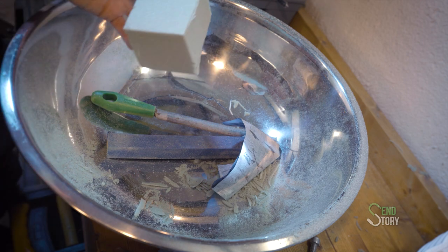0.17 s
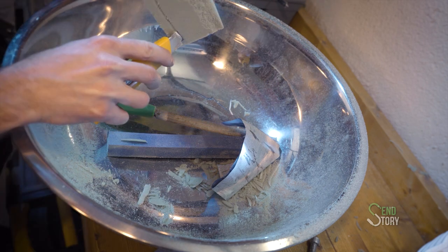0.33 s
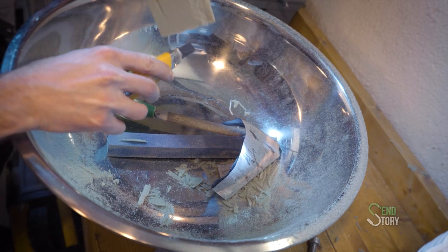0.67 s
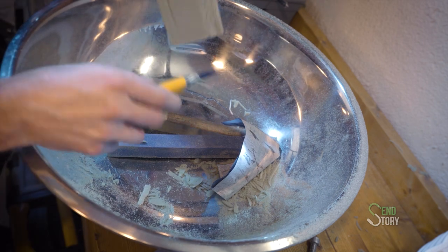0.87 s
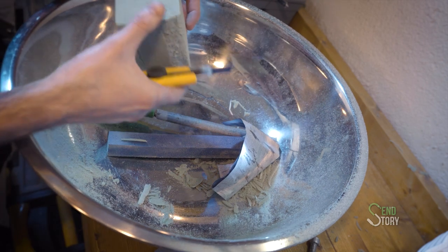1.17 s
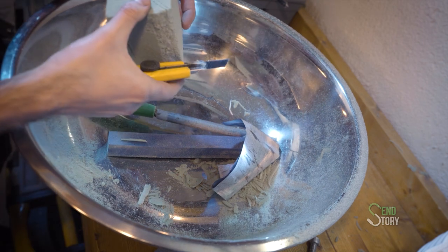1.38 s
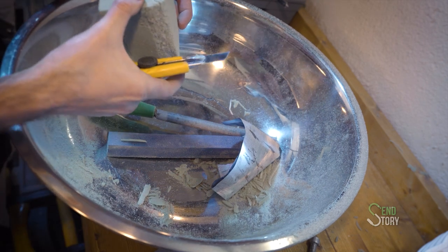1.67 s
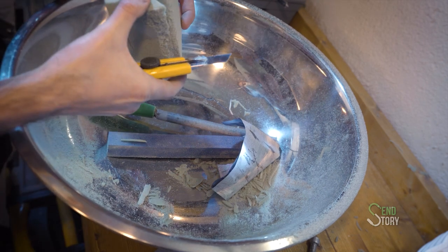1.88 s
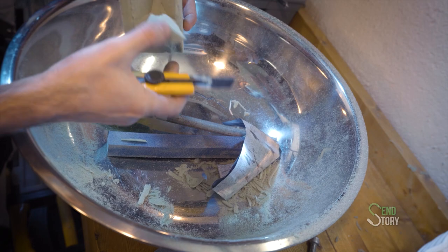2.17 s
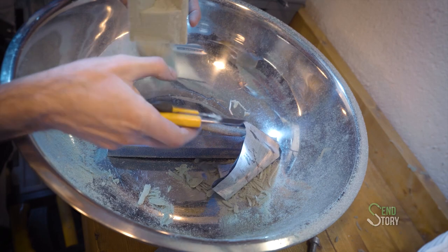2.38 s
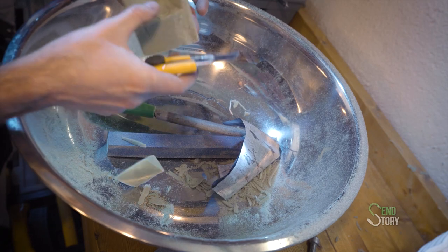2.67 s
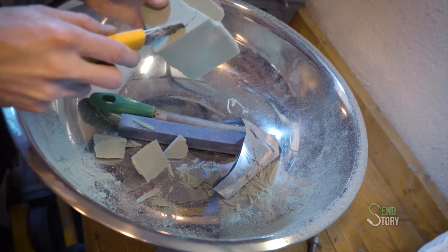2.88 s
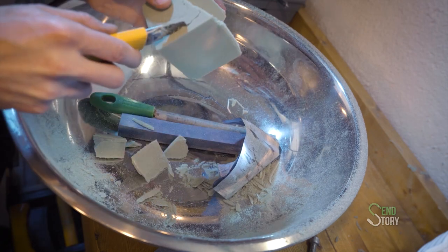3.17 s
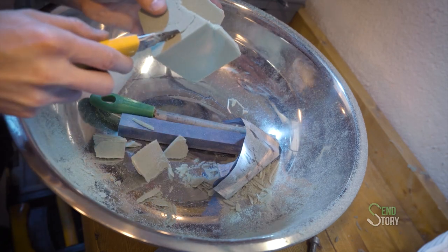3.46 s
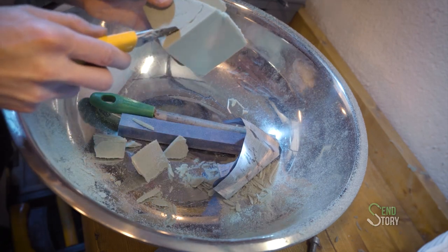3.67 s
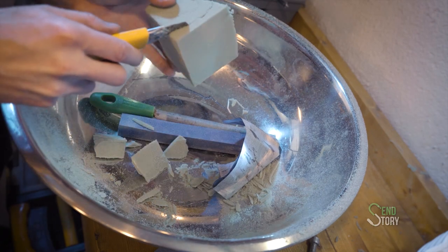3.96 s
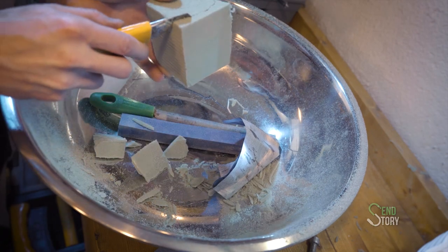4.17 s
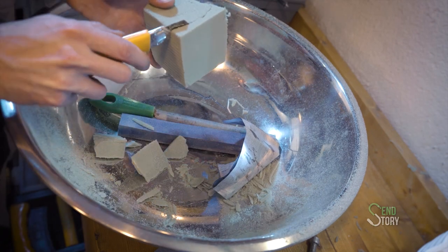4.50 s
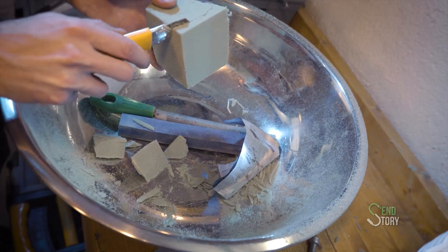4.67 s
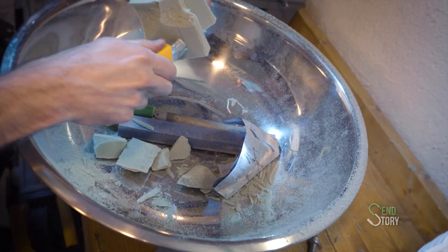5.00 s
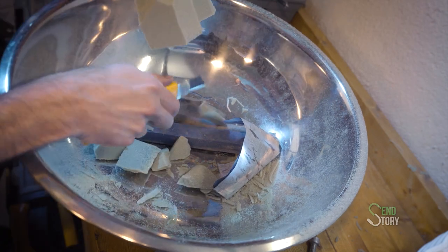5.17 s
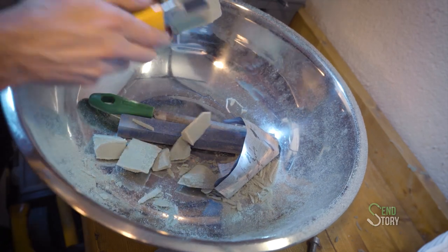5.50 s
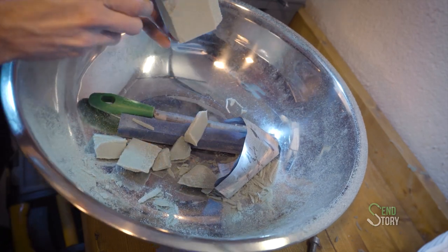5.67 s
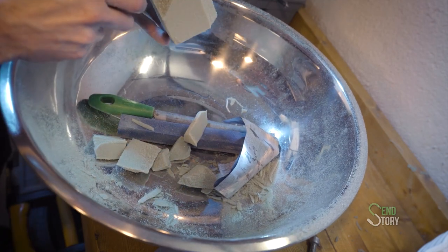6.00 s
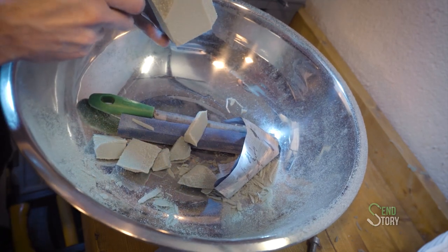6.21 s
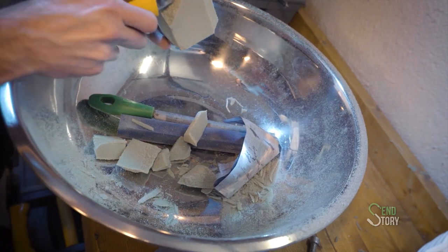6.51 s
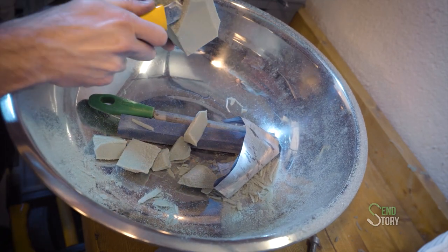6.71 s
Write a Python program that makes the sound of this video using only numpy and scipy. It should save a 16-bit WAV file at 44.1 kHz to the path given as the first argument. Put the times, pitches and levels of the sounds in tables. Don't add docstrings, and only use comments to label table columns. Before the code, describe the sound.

Close, dry cutting of a brittle foam block: crisp cracks, gritty sawing, a ripping slice, light taps on steel, then another loud tear.

```python
import sys
import numpy as np
from scipy import signal
from scipy.fft import rfft, irfft, next_fast_len
from scipy.io import wavfile
from scipy.ndimage import uniform_filter1d, map_coordinates

SR = 44100
rng = np.random.default_rng(int(sys.argv[2]) if len(sys.argv) > 2 else 0)


def materialize(psi):
    bounded = np.clip(np.atleast_2d(psi).T, -1, 1)
    quanta = np.round(bounded * 32767).astype(np.int16)
    wavfile.write(sys.argv[1], SR, quanta)


def makeup_ratio(level_db):
    decades = np.asarray(level_db, float) / 20
    return 10 ** decades


N = 302085


def unit(x):
    return x / np.sqrt(np.mean(x ** 2) + 1e-20)


def along(points, hz):
    f, v = np.transpose(points)
    return np.interp(np.log(hz + 1), np.log(f + 1), v)


def wobble(rate, size=N):
    knots = rng.standard_normal(int(N * rate / SR) + 4)
    return map_coordinates(knots, [np.arange(size) * rate / SR])


def filtered(x, response):
    m = next_fast_len(N + SR // 2)
    return irfft(rfft(x, m) * response(np.fft.rfftfreq(m, 1 / SR)), m)[..., :N]


def causal(spectrum):
    def response(hz):
        cepstrum = irfft(np.log(makeup_ratio(along(spectrum, hz)) + 1e-5))
        half = len(cepstrum) // 2
        cepstrum[1:half] *= 2
        cepstrum[half + 1:] = 0
        return np.exp(rfft(cepstrum))
    return response


def resonances(modes, f):
    return sum((-1) ** k * makeup_ratio(db) * 1j * f * w / (c * c - f * f + 1j * f * w)
               for k, (c, w, db) in enumerate(modes))


def peak(x, hz, width_hz):
    return signal.lfilter(*signal.iirpeak(hz, hz / width_hz, SR), x)


def highpass(x, order, hz):
    return signal.lfilter(*signal.butter(order, hz, "high", fs=SR), x)


def swells(rows, rest_db):
    t = np.arange(N) / SR
    return makeup_ratio(rest_db) + sum(makeup_ratio(db) * np.exp(-(2 * (t - s) / length) ** 2) for s, length, db in rows)


def workshop():
    # (frequency [Hz], density [dB per Hz])
    air = [(82, -25), (140, -6.5), (244, -16), (491, -14.5), (688, -17), (1560, -19.5), (3660, -16.5),
           (8280, -20.5), (15100, -24.5), (16300, -43.5)]
    # (frequency [Hz], level [dB rms])
    mains = [(59.2, -85.5), (118.4, -86.5), (177.6, -90)]
    # (time [s], length [s], level [dB])
    deep = [
        (0, 0.35, -71.5),
        (2.078, 0.55, -82.5),
        (4.296, 0.3, -70.5),
        (5.416, 0.3, -66),
        (6.001, 0.94, -73.5),
    ]
    # (time [s], length [s], level [dB])
    tremor = [
        (0, 0.22, -70.5),
        (3.3, 0.35, -65),
        (3.65, 0.31, -66),
        (4.15, 0.61, -59),
        (5.049, 0.48, -79.5),
        (6, 0.28, -80),
    ]
    # (time [s], length [s], level [dB])
    drone = [
        (.95, 0.23, -79.5),
        (3.15, 0.32, -86),
        (5.25, 0.44, -64.5),
        (6.05, 0.66, -67.5),
        (6.65, 0.81, -72.5),
    ]
    rest_db = [-77, -75.5, -77]
    t = np.arange(N) / SR
    hiss = unit(filtered(rng.standard_normal(N), lambda f: makeup_ratio(along(air, f))))
    hiss = makeup_ratio(-77.5 + .3 * wobble(1.7)) * hiss
    hum = sum(makeup_ratio(db + 6.0 + 0.92 * wobble(1.5)) * np.sin(2 * np.pi * hz * t) for hz, db in mains)
    bands = [[(32.32, 13, 0)], [(63.0, 8.8, 0)], [(83.4, 2.2, 1.0), (117.0, 16, -6)]]  # (Hz, width Hz, dB)
    lows = [unit(filtered(rng.standard_normal(N), lambda f: resonances(b, f) ** 2)) for b in bands]
    muscle_tone = np.sin(2 * np.pi * 57.5 * t + 1.5 * wobble(5))
    lows[1] = .45 * lows[1] + 1.25 * muscle_tone
    rumble = sum(swells(rows, db) * low for rows, db, low in zip([deep, tremor, drone], rest_db, lows))
    return hiss + hum + rumble


def pressure():
    # (full at [s], rise [s], hold [s], fall [s], rasp level [dB])
    prising = [(0, .01, 0.021, 0.05, -73), (0.301, .002, 0.022, 0.022, -57),
               (0.458, 0.065, 0.0054, .003, -35.5), (0.602, .04, 0.031, 0.019, -59.5),
               (0.704, .1, 0, 0.012, -40), (1.227, 0.0037, 0.018, 0.048, -45),
               (1.447, 0.053, 0.02, 0.087, -49), (1.756, 0.00026, 0.061, 0.045, -19),
               (1.964, 0.019, 0.062, 0.056, -39.5), (2.092, .002, 0.053, 0.023, -51.5),
               (2.164, .001, 0, 0.072, -41), (2.258, 0.027, 0, 0.1, -56)]
    # (full at [s], rise [s], hold [s], fall [s], rasp level [dB])
    slicing = [(2.767, 0.0033, 0.0014, 0.075, -53.5), (2.83, 0.0067, 0, 0.029, -44.5),
               (2.93, 0.13, 0.019, .005, -59.5), (2.974, 0.026, 0.013, 0.0063, -42.5),
               (3.027, 0.0092, 0.0054, 0.032, -37), (3.201, 0.1, 0.036, .5, -49.5),
               (3.523, 0.024, 0.017, 0.039, -44), (3.597, 0.026, 0.082, 0.0085, -35.5),
               (4.43, 0.136, 0.035, 0.057, -44), (4.52, 0.067, 0.12, 0.24, -62.5),
               (4.913, 0.01, 0.022, 0.018, -36), (4.956, 0.011, 0.014, 0.03, -32.5),
               (4.991, 0.024, .02, 0.0093, -41), (4.647, .006, .03, .012, -48),
               (4.725, 0.0079, 0.019, .01, -63), (5.035, 0.00081, 0.015, 0.087, -30),
               (5.102, 0.063, 0.022, 0.011, -28), (5.9, 0.0051, 0.028, 0.097, -53),
               (6.105, 0.0061, 0.03, 0.072, -55), (6.242, .003, 0.033, 0.039, -52),
               (6.284, 0.055, 0.045, 0.33, -36.5), (6.43, 0.0086, 0.05, 0.011, -40),
               (6.54, 0.032, 0.045, 0.0062, -55), (6.56, 0.016, 0.054, .01, -40.5),
               (6.652, 0.0075, 0.0011, 0.07, -24), (6.85, 0.11, 0.12, .01, -53)]
    # (time [s], rasp level [dB])
    long_cut = [
        (3.68, -51.5),
        (3.8, -41),
        (3.88, -38.5),
        (4.01, -44),
        (4.09, -38.5),
        (4.21, -47),
        (4.23, -40.5),
        (4.29, -42.5),
        (4.335, -91.5),
    ]
    edge_db = 20
    bite = 1.4
    usual = makeup_ratio(-47.5)
    t = np.arange(N) / SR
    s, db = np.transpose(long_cut)
    gain = makeup_ratio(np.interp(t, s, db, -150, -150))
    for s, rise, hold, fall, db in prising + slicing:
        part = slice(max(round((s - bite * rise) * SR), 0), round((s + hold + 5 * fall) * SR))
        edge = np.maximum((s - t[part]) / rise, (t[part] - s - hold) / fall)
        gain[part] += makeup_ratio(db - edge_db * np.maximum(edge, 0))
    thrum = gain * makeup_ratio(-16)
    fizz = usual * makeup_ratio(-7) * (gain / usual) ** 0.91
    return np.array([gain, thrum, fizz])


def crackle(per_s, spread_db, life_s):
    sizes = makeup_ratio(spread_db * np.minimum(rng.exponential(size=N), 4))
    clicks = (rng.random(N) < per_s / SR) * sizes
    puff = signal.lfilter([1], [1, -np.exp(-1 / (life_s * SR))], clicks)
    return unit(puff * rng.standard_normal(N))


def patchy(x, patchy_db):
    z = signal.stft(x, nperseg=512)[2]
    field = uniform_filter1d(rng.standard_normal(z.shape), size=7, axis=0)
    field = uniform_filter1d(field, size=9, axis=1)
    return signal.istft(z * makeup_ratio(patchy_db * unit(field)), nperseg=512)[1][:N]


def strokes():
    # (frequency [Hz], width [Hz])
    blade = [(2880, 140), (3400, 140), (3820, 140), (4480, 140), (5360, 200), (6200, 160), (7200, 140),
             (8400, 200)]
    grain = crackle(per_s=4000, spread_db=1.5, life_s=.0004)
    grain = grain + .15 * crackle(per_s=230, spread_db=0.5, life_s=0.0019)
    grain = patchy(grain, patchy_db=2.5) * makeup_ratio(.8 * wobble(60))
    modes = [(hz, w, 0) for hz, w in blade]
    shallow = filtered(grain, lambda f: resonances(modes, f * 1.03))
    deep = filtered(grain, lambda f: resonances(modes, f / 1.03))
    depth = .5 + .5 * np.tanh(2 * wobble(8.4))
    ringing = depth * deep + (1 - depth) * shallow
    return makeup_ratio(-1.5) * pressure() * unit(grain + .8 * ringing)


def grip():
    # (from [s], thrum [dB], block tilt [dB/octave], cut-face tilt [dB/octave], fizz [dB])
    grips = np.transpose([(0, -6.5, 0.5, -4, -0.5), (1.15, -4, 1.5, -2, -1), (1.55, -9, 7, 5, 0.5),
                          (1.74, -9.5, 4.5, 5, 2.5), (2.3, -8.5, -5, 10.5, 9), (2.6, -4, 3, 27, 5.5),
                          (2.75, -12, 8, 1, -2.5), (2.947, 2.5, -0.5, 0, 0.5), (3.452, 0.5, -0.5, -2, 0.5),
                          (3.752, -0.5, 0.5, 2.5, 0), (4.34, -1, 4.5, -1, 0.5), (4.881, 5.5, 1.5, 4, 5.5),
                          (5.03, 0, 2, 3, 3.5), (5.22, -6, -5.5, 1, 0.5), (6.151, 2.5, 1.5, 5.5, 4),
                          (6.521, 2, 4, 2, 3)])
    current = np.searchsorted(grips[0][1:], np.arange(N) / SR)
    return grips[1:, current]


def gripped(x, modes, mode_db, tilt):
    middle = modes[len(modes) // 2][0]
    return sum((-1) ** k * peak(x * makeup_ratio(db + tilt * np.log2(hz / middle)), hz, w)
               for k, ((hz, w), db) in enumerate(zip(modes, mode_db)))


def voices(x):
    # (frequency [Hz], density [dB per Hz])
    rasp_shape = [(1100, -40), (1750, -3.5), (2250, 2), (2880, 1.5), (4380, 7), (5700, -6), (8100, 0),
                  (9400, -16.5), (12000, -41), (19000, -100)]
    # (frequency [Hz], density [dB per Hz])
    fizz_shape = [(4000, -50), (6500, -21.5), (8700, 3), (9900, -5), (11500, -2), (13600, -11.5),
                  (15300, -20), (15900, -24.5), (17000, -60)]
    # (frequency [Hz], width [Hz])
    block_modes = [(340, 110), (640, 84), (1010, 260), (1400, 205), (1900, 680)]
    block_db = [-4, 3, -3, 1, -7]
    # (frequency [Hz], width [Hz])
    face_modes = [(2650, 2100), (4200, 490), (6100, 640)]
    face_db = [-8.5, 3, 6]

    def coloured(drive, spectrum):
        path = causal(spectrum)
        power = np.mean(abs(path(np.fft.rfftfreq(8192, 1 / SR))) ** 2)
        return filtered(drive, path) / np.sqrt(power)

    rasp_drive, thrum_drive, fizz_drive = x
    thrum_db, block_tilt, face_tilt, fizz_db = grip()
    face = 0.6 * rasp_drive + gripped(rasp_drive, face_modes, face_db, face_tilt)
    rasp = coloured(face, rasp_shape)
    fizz = coloured(fizz_drive * makeup_ratio(fizz_db), fizz_shape)
    thrum = highpass(thrum_drive * makeup_ratio(thrum_db), 4, 270)
    block = makeup_ratio(16.5) * gripped(thrum, block_modes, block_db, block_tilt)
    return rasp + fizz + highpass(flaps(rasp_drive), 2, 400) + block


def handling():
    # (time [s], frequency [Hz], level [dB], length [s])
    rubs = [(0.118, 910, -70, 0.025), (0.091, 150, -81, 0.3), (0.19, 4000, -77.5, 0.2),
            (0.951, 333, -75, 0.1), (1.101, 3200, -81, .1), (2.72, 212, -77, 0.074), (5, 400, -73, 0.04),
            (5.571, 670, -72.5, 0.11), (5.75, 630, -86, 0.3), (5.621, 324, -67.5, .04),
            (5.76, 330, -69.5, 0.045), (5.78, 3300, -75.5, 0.027), (5.59, 2904, -74, .03),
            (0.978, 3100, -75.5, 0.022), (1.119, 325.5, -78.5, 0.067), (6.178, 320, -69, 0.08),
            (6.43, 305, -61, 0.15), (3.27, 280, -65, 0.068)]
    out, t = np.zeros(N + SR), np.arange(-SR // 2, SR // 2) / SR
    for s, hz, db, length in rubs:
        rub = unit(peak(rng.standard_normal(SR), hz, hz / 7))
        out[round(s * SR):][:SR] += makeup_ratio(db) * np.exp(-(2 * t / length) ** 2) * rub
    return out[SR // 2:][:N]


def snaps():
    # (time [s], peak [dB], t60 [s])
    cracks = [(.3217, -35, 0.018), (.4105, -29.5, 0.015), (.4399, -19.5, 0.0071), (.4529, -27.5, 0.011),
              (.4743, -1.5, 0.0077), (.6534, -28, 0.017), (1.2296, -44.5, 0.012), (1.5663, -19, 0.0064),
              (1.6008, -12.5, 0.03), (1.6142, -9.5, 0.012), (1.7744, -8, 0.0066), (1.8294, -10, 0.012),
              (1.8791, -16, 0.016), (1.956, -16.5, 0.0026), (2.0672, -25, 0.01), (2.0966, -29, 0.033),
              (2.1301, -23.5, 0.022), (2.157, -24, 0.012), (2.2518, -31, 0.0044), (2.2894, -44.5, 0.014),
              (2.5646, -29.5, 0.014), (2.6195, -23.5, 0.0085), (2.629, -32.5, 0.0075), (2.639, -56, 0.0084)]
    # (time [s], peak [dB], t60 [s])
    splits = [(0.3346, -39.5, 0.0099), (0.3507, -58.5, 0.012), (0.3746, -47, 0.0097),
              (0.3847, -47.5, 0.012), (0.4035, -37, 0.012), (0.4271, -27.5, 0.012), (0.538, -33, 0.011),
              (0.5626, -50, 0.0078), (0.5784, -42, 0.0096), (0.5914, -45, 0.015), (0.5994, -32, 0.0086),
              (0.6193, -40.5, 0.01), (0.6283, -38.5, 0.011), (0.6464, -35, 0.012), (1.7798, -9.5, 0.014),
              (1.7946, -9, 0.011), (1.812, -18.5, 0.014), (1.8446, -17.5, 0.019), (1.8874, -32, 0.017),
              (1.9051, -41, 0.012), (1.9108, -26, 0.0089), (1.9612, -19, 0.0063), (1.9757, -18.5, 0.0069),
              (1.9827, -25.5, 0.0096), (1.993, -17.5, 0.012), (2.0082, -23, 0.0071), (2.0158, -21, 0.0057),
              (2.028, -27, 0.015), (2.0364, -24.5, 0.012), (2.0466, -27, 0.014), (2.0757, -37, 0.012),
              (2.1059, -28, 0.014), (2.165, -28, 0.026), (2.1761, -37, 0.02)]
    # (time [s], peak [dB], t60 [s])
    ticks = [
        (.8654, -43.5, 0.048),
        (1.0545, -47.5, 0.031),
        (1.4391, -48, 0.013),
        (1.9395, -16.5, 0.015),
        (2.3715, -36, 0.015),
        (3.3398, -37, 0.03),
        (5.3896, -30.5, 0.034),
        (5.398, -31.5, 0.017),
        (6.576, -15, 0.027),
    ]
    # (time [s], peak [dB], t60 [s])
    knocks = [
        (.6994, -39, 0.025),
        (5.24, -25, 0.0095),
        (5.3133, -46, 0.009),
        (5.365, -44.5, 0.073),
        (5.5608, -52.5, 0.0072),
    ]
    # (time [s], peak [dB], t60 [s])
    tears = [(3.0031, -34, .021), (3.1802, -33, 0.019), (3.2206, -28, 0.039), (3.243, -30.5, 0.05),
             (3.2535, -31, 0.025), (3.2839, -30.5, 0.012), (3.2994, -34, 0.014), (3.3653, -30, 0.038),
             (3.3902, -35, 0.025), (3.4455, -30.5, 0.031), (3.9584, -25, 0.007), (4.3585, -25, 0.019),
             (4.3804, -28, 0.04), (4.4054, -20.5, 0.022), (4.4408, -12, 0.02), (4.4977, -10.5, 0.041),
             (4.5176, -17.5, 0.027), (4.5895, -24, 0.025), (4.8544, -38, 0.071), (4.8798, -30.5, 0.016),
             (6.0062, -45, 0.017)]
    # (time [s], peak [dB], t60 [s])
    catches = [(3.1234, -55, 0.012), (3.1363, -33.5, 0.013), (3.148, -37, 0.012), (3.2357, -41, 0.015),
               (3.2633, -24, 0.018), (3.3207, -22, 0.014), (3.4088, -31, 0.015), (3.4657, -26.5, 0.023),
               (3.4915, -44, 0.012), (3.6751, -23, 0.014), (3.6996, -31, 0.012), (3.738, -37, 0.012),
               (3.7595, -19, 0.017), (3.7697, -26, 0.011), (3.7921, -36, 0.011), (3.8339, -17.5, 0.013),
               (3.8624, -24, 0.015), (3.8707, -19, 0.015), (3.8808, -33, 0.011), (3.8963, -37, 0.013),
               (3.9715, -25, 0.012), (4.023, -31, 0.01), (4.029, -24, 0.014), (4.0437, -23, 0.012),
               (4.0314, -21, 0.01), (4.0958, -31, 0.013), (4.1042, -36.5, 0.016), (4.1144, -27, 0.012),
               (4.1213, -29, 0.016), (4.1542, -24.5, 0.016), (4.1686, -26, 0.012), (4.1861, -46, 0.012),
               (4.219, -41.5, 0.012), (4.2309, -30.5, 0.013), (4.2891, -35, 0.012)]
    # (time [s], peak [dB], t60 [s])
    jerks = [
        (4.3859, -27.5, 0.012),
        (4.4902, -23, 0.015),
        (5.0792, -14, 0.012),
        (5.0858, -23, 0.014),
        (5.0921, -12, 0.012),
        (6.2652, -27, 0.012),
        (6.4145, -35.5, 0.019),
        (6.4247, -35.5, 0.01),
        (6.431, -20.5, 0.014),
        (6.7317, -25.5, 0.012),
    ]
    # (time [s], peak [dB], t60 [s])
    rips = [(5.0345, -14.5, 0.012), (5.0454, -17, 0.016), (5.1083, -6, 0.036), (6.513, -25, 0.042),
            (6.539, -31, 0.012), (6.5495, -26.5, 0.0204), (6.5565, -20, 0.016), (6.5974, -18, 0.012),
            (6.6074, -11.5, 0.02), (6.6288, -6, 0.029), (6.6508, -6.5, 0.014), (6.6574, -15.5, 0.0067),
            (6.6674, -12, .012), (6.6844, -13.5, 0.017), (6.71, -15.5, 0.024), (6.7705, -26, 0.0086),
            (6.8359, -24.5, 0.011)]
    # (rows, trim dB, thrum dB, fizz dB)
    families = [(cracks, 0, -21, -12.5), (tears, 0, -34, -12), (rips, 0, -27.5, -11), (ticks, 0, -19.5, -33),
                (knocks, 0, -10, -9.5), (splits, 0, -20.5, -10), (catches, -5.5, -28, -15.5),
                (jerks, -1, -22.5, -8)]
    out, t = np.zeros((3, N + 2048)), np.arange(2048) / SR
    for rows, trim_db, thrum_db, fizz_db in families:
        drive_db = np.array([[0], [thrum_db + 8.0], [fizz_db + 6.0]])
        for s, db, t60 in rows:
            t60 = max(t60, .003)
            opening = 1 - np.exp(-t / (1.6 * t60 ** 2))
            body = (makeup_ratio(-60 * t / t60) + 0.28 * makeup_ratio(-60 * t / .05)) * opening
            click = 0.4 * makeup_ratio(-60 * t / 0.001)
            burst = rng.standard_normal(2048) * (body + click)
            out[:, round(s * SR):][:, :len(t)] += makeup_ratio(db + trim_db - 9.5 + drive_db) * burst
    return out[:, :N]


def flaps(x):
    # (from [s], to [s], frequency [Hz], width [Hz], level [dB])
    hanging = [(0.42, 0.53, 1974, 341.5, 6), (.46, 0.635, 1150, 197.5, 1), (0.459, 0.696, 520, 150.5, -13),
               (1.56, 1.627, 2300, 400, 7.5), (6.54, 7.2, 1010, 310, 3), (1.22, 1.58, 2470, 360, 10),
               (1.764, 1.842, 930, 200, 0.5), (2.23, 2.601, 1720, 149.7, 8.5), (2.4, 2.75, 4210, 500, 13.5),
               (2.76, 2.82, 2130, 300, 11), (3.509, 3.6, 2350, 230, 12), (4.02, 4.479, 2600, 427, 7),
               (4.023, 4.135, 4400, 340, 11.5), (4.43, 4.69, 1420, 200, -1), (4.91, 5.022, 1940, 120, 15),
               (5.028, 5.055, 1443, 150, 14), (5.07, 5.125, 1393, 145, 5.5),
               (5.073, 5.124, 2926, 180, 12.5), (4.513, 4.901, 4870, 330, 0.5),
               (5.377, 5.6, 3270, 400, 13.5), (5.378, 5.397, 2070, 506, 16), (3.897, 4.102, 3320, 240, -9),
               (6.431, 6.47, 4380, 240, 13)]
    # (from [s], to [s], frequency [Hz], width [Hz], level [dB])
    more_hanging = [(1.427, 1.49, 2670, 150, 1), (1.75, 1.838, 2890, 150, -2), (1.763, 1.813, 6220, 150, 0),
                    (2.95, 3.073, 594, 120, -6), (3.1, 3.453, 2320, 150, -4), (3.1, 3.458, 4450, 200, -12),
                    (3.7, 4.32, 630, 200.1, -15), (3.7, 4.33, 1414, 121, 1.5), (3.755, 4.29, 2600, 185, 7),
                    (3.8, 4.306, 2920, 78.2, 12.5), (3.8, 4.3, 4130, 250, 7), (3.8, 4.3, 5140, 200, 7),
                    (4.36, 4.555, 3020, 109.4, 6.5), (4.36, 4.55, 3450, 200, 1), (4.934, 5.02, 4700, 200, 8),
                    (6.236, 6.37, 4220, 129, 10), (2.161, 2.184, 680, 150, -4), (6.254, 6.405, 3310, 101, 13.5),
                    (6.552, 6.624, 1190, 100, 3.5), (6.62, 6.733, 4250, 250, 9)]
    out = np.zeros(N)
    x = x * np.sign(rng.standard_normal(N))
    for start, end, hz, w, db in hanging + more_hanging:
        part = slice(round(start * SR), round(end * SR))
        out[part] += makeup_ratio(db) * peak(x[part], hz, w)
    return out


def damped(x):
    # (from [s], to [s], frequency [Hz], width [Hz], share removed [0-1])
    pressed = [(1.9, 2.1, 2100, 405, 0.93), (2.95, 3.5, 920, 200, 0.8), (2.954, 3.5, 1820, 350, 0.4),
               (3.7, 4.33, 964, 250, 0.6), (3.7, 4.332, 2050, 404, 0.44), (4.346, 4.89, 1900, 352, 0.8),
               (4.4, 4.752, 990, 303, 0.67), (4.9, 5.02, 1420, 300, 0.2), (5.014, 5.22, 2300, 597, 0.4),
               (0.716, 1.193, 2510, 600, 0), (6.544, 6.75, 780, 253, 0.86), (6.594, 6.8, 2900, 600, 0.4)]
    out = x.copy()
    for start, end, hz, w, share in pressed:
        part = slice(round(start * SR), round(end * SR))
        out[part] -= share * peak(out[part], hz, w)
    return out


def thuds():
    # (time [s], frequency [Hz], level [dB], t60 [s])
    hits = [
        (2.5646, 298, -55, .06),
        (2.5646, 560, -60, .05),
        (2.619, 303, -53, 0.056),
        (2.619, 510, -57, .06),
        (5.24, 1280, -42, 0.037),
        (5.24, 952, -46, .07),
        (5.24, 620, -53, 0.094),
        (5.5608, 640, -60.5, .06),
    ]
    out, t = np.zeros(N + SR), np.arange(SR // 4) / SR
    for s, hz, db, t60 in hits:
        out[round(s * SR):][:len(t)] += makeup_ratio(db - 60 * t / t60) * np.sin(2 * np.pi * hz * t)
    return out[:N]


def bowl():
    # (time [s], peak [dB], favoured frequency [Hz], fall-off [dB/octave])
    taps = [
        (5.24, -46.5, 359, 0),
        (5.314, -34.5, 1510, 13.5),
        (5.561, -62, 790, 2),
    ]
    # (frequency [Hz], level [dB], t60 [s])
    bowl_modes = [(343, -31, 4), (349, -34, 4), (361, 2, .2), (587, -25, 4), (662, -8, .14), (750, 0, .015),
                  (850, -14, .15), (995, -15, .15), (1300, -8, .02), (1700, -3, .012), (1740, -24, .2),
                  (3600, -24, .3), (4550, -13, .16), (4624, -16, .29)]
    # (from [s], to [s], frequency [Hz], level [dB])
    start, end, skate_hz, skate_db = (5.313, 5.46, 11940, -69)
    out, t = np.zeros(N + SR), np.arange(SR) / SR
    rattle = [4.5 * wobble(16, size=SR) for mode in bowl_modes]
    for s, tap_db, spot_hz, fall_db in taps:
        ring = np.zeros(SR)
        for (hz, db, t60), rattle_db in zip(bowl_modes, rattle):
            mode_db = db + rng.normal(0, 1.0) + rattle_db - fall_db * abs(np.log2(hz / spot_hz))
            ring += makeup_ratio(mode_db - 60 * t / t60) * np.sin(2 * np.pi * hz * t)
        out[round(s * SR):][:SR] += makeup_ratio(tap_db) * ring
    out = highpass(out, 2, 300)
    t = np.arange(N) / SR
    swell = np.sin(np.pi * np.clip((t - start) / (end - start), 0, 1)) ** 0.57
    skating = np.sin(2 * np.pi * skate_hz * t + 1.7 * wobble(150))
    return out[:N] + makeup_ratio(skate_db + 1.5 * wobble(35)) * swell * skating


def room(x):
    # (frequency [Hz], t60 [s])
    decay = [(300, 0.16), (2500, 0.29), (6000, 0.27), (12000, 0.19)]
    out, step = np.zeros(N + SR), SR // 3
    for start in range(0, N, step):
        hz, t, z = signal.stft(rng.standard_normal(SR // 2), SR, nperseg=256)
        dying = z * makeup_ratio(-60 * t / along(decay, hz)[:, None])
        tail = signal.istft(dying, SR, nperseg=256)[1]
        wet = signal.fftconvolve(x[start:start + step], tail / np.linalg.norm(tail))
        out[start + 200:][:len(wet)] += wet
    return out[:N]


def scene():
    near = damped(voices(strokes() + snaps())) + bowl() + handling() + thuds()
    return (near + makeup_ratio(-9.0) * room(near) + workshop())[None]


def low_pass(x):
    return signal.sosfilt(signal.butter(12, 16500, fs=SR, output="sos"), x)


def record(dry):
    rounded = dry / (1 + abs(dry / .62) ** 4) ** (1 / 4)
    mix = filtered(rounded, lambda hz: np.where(hz < 15950, 1, makeup_ratio(-30)))
    return low_pass(mix)


dry = scene()
out = record(dry)
materialize(out)
```